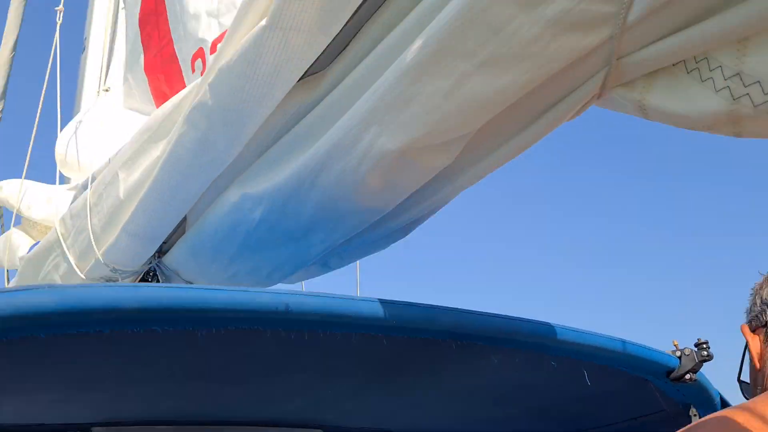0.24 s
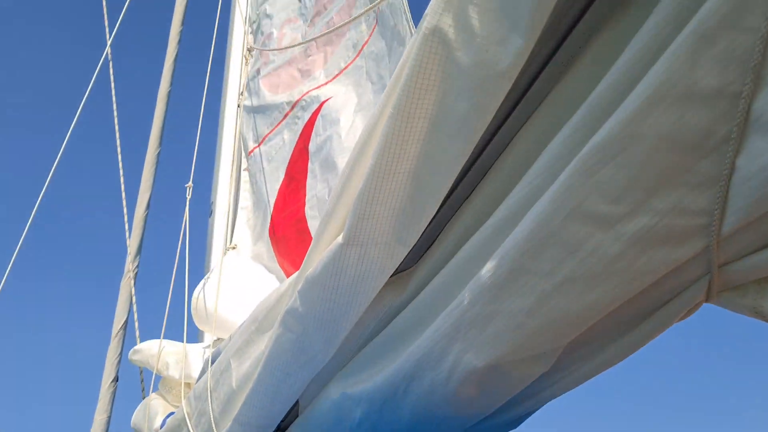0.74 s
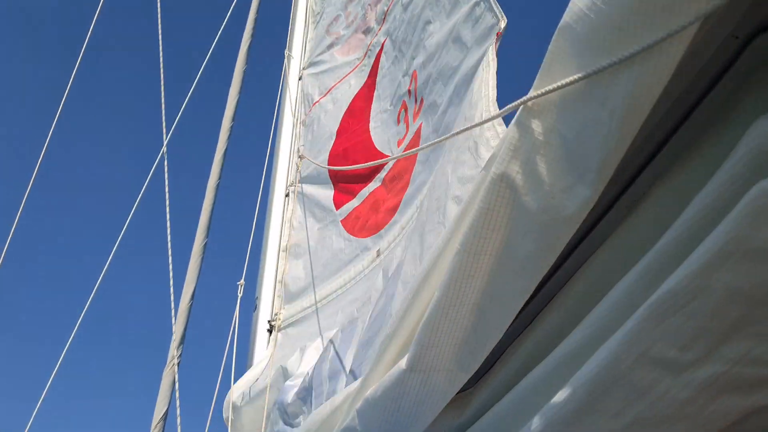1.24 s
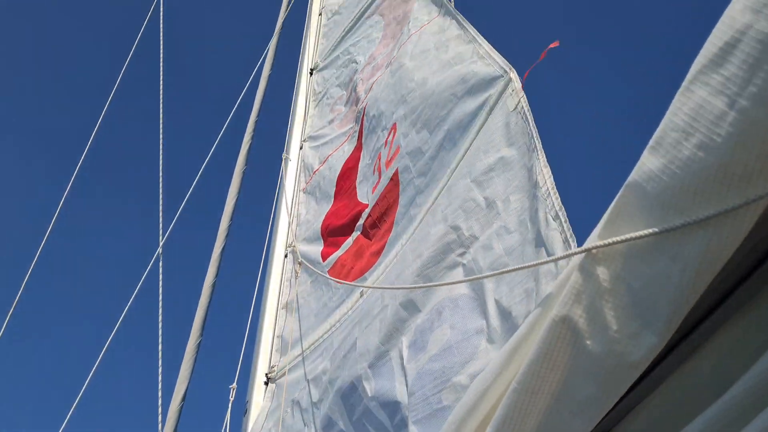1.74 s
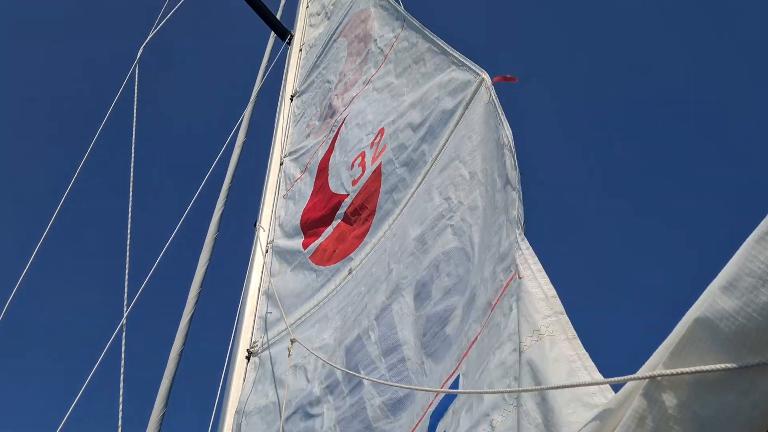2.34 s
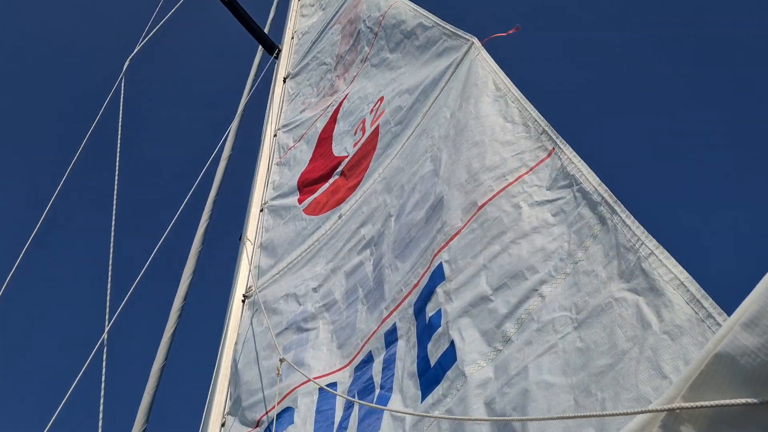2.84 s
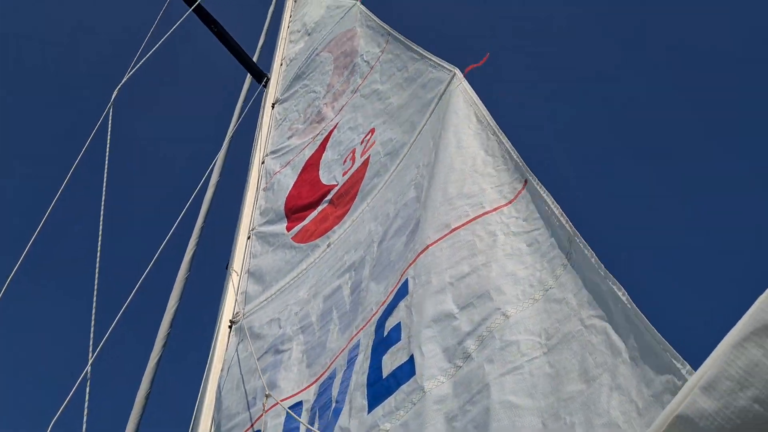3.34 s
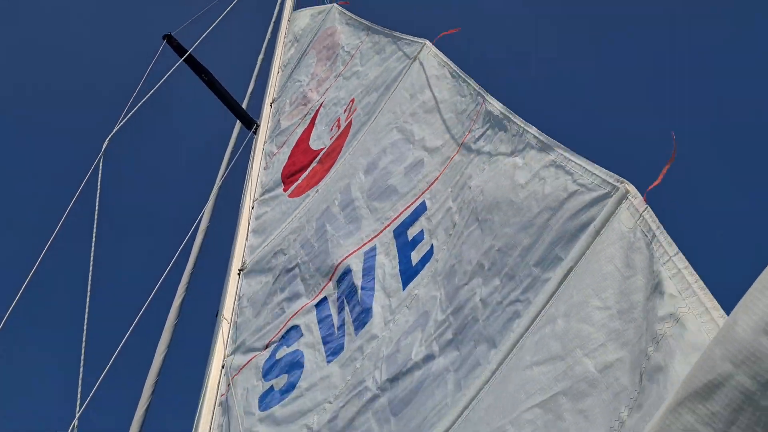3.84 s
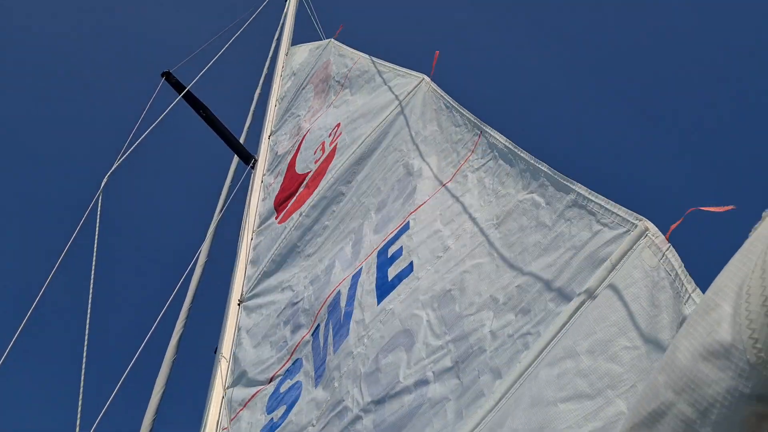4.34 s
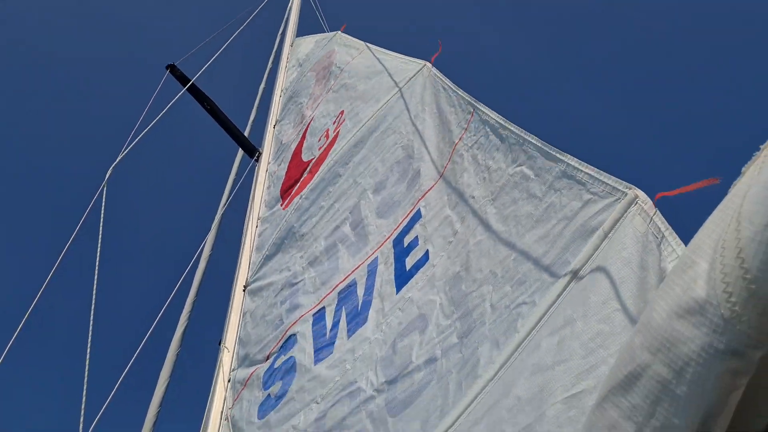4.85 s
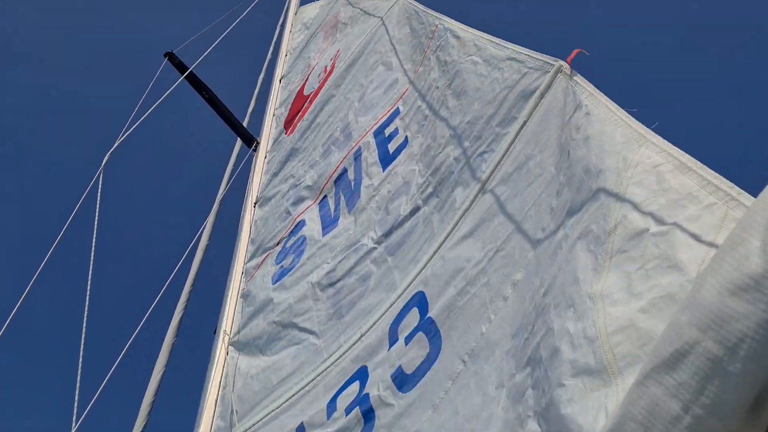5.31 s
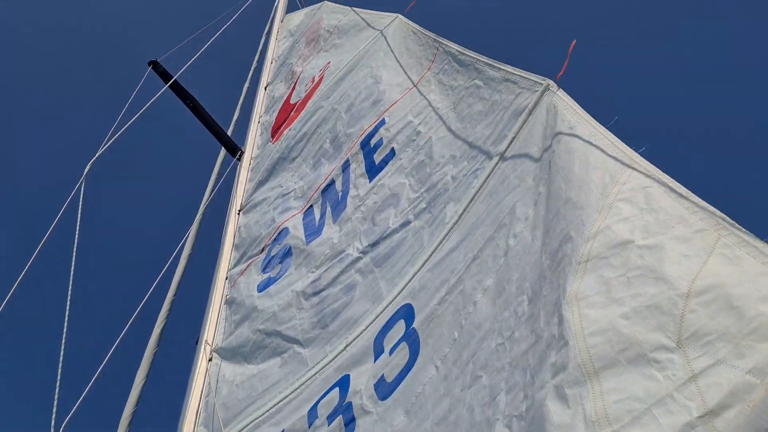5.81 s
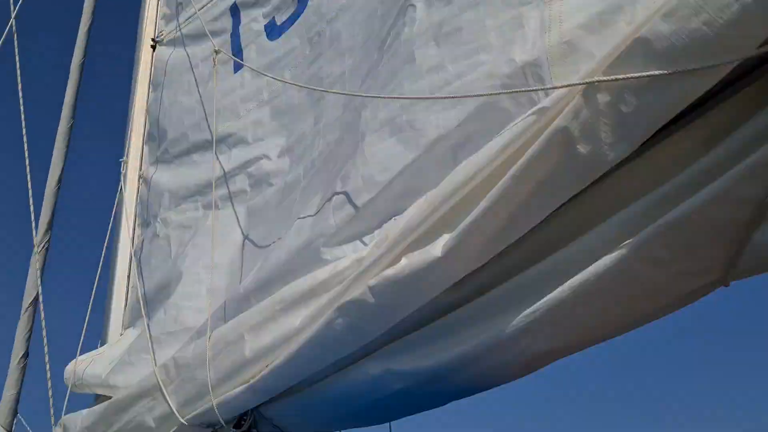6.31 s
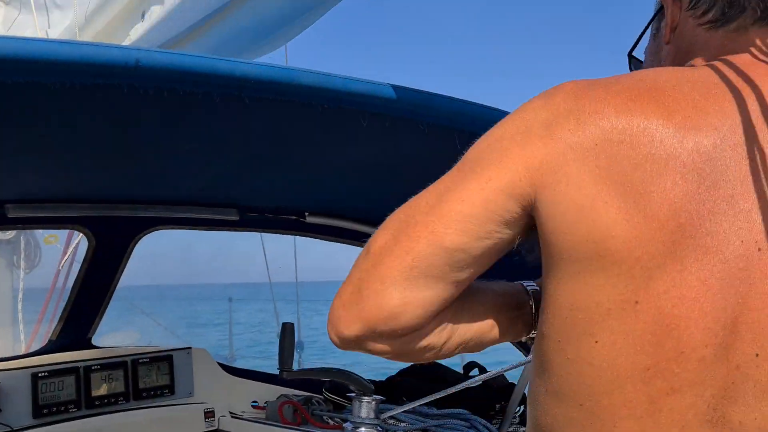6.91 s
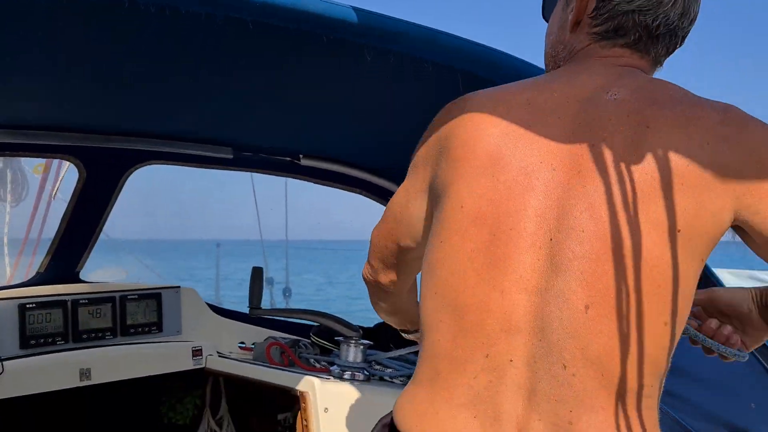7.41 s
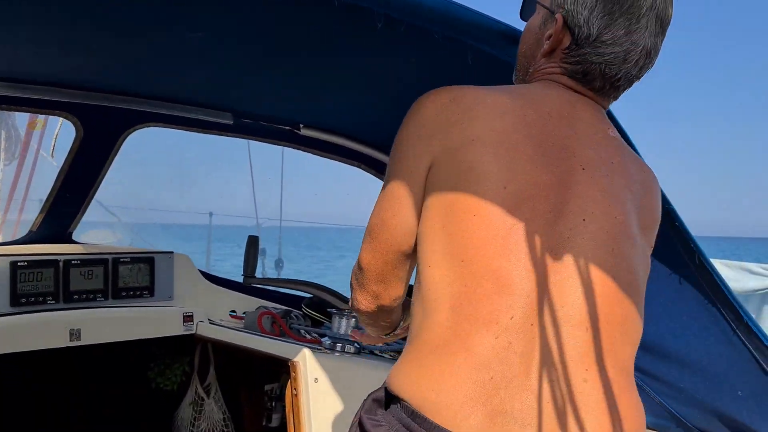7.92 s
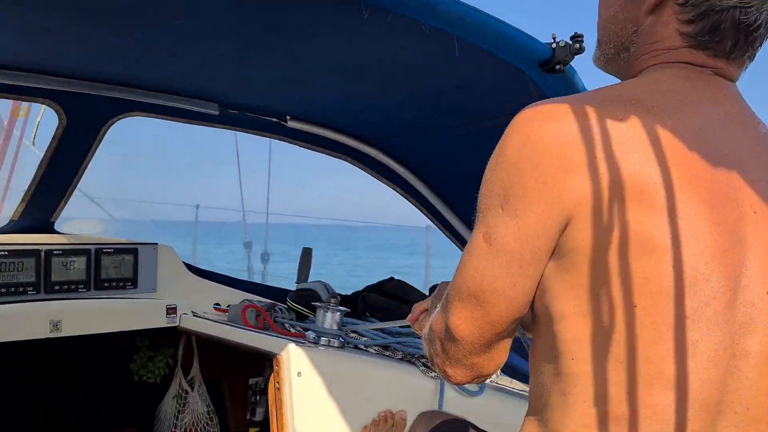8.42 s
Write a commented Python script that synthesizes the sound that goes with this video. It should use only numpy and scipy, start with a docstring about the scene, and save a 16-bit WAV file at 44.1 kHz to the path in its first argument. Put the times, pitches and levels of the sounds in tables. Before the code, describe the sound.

Bursts of rapid steel pawl clicks speed up and slow down as a small winch is cranked on deck, with quiet creaks, water and wind rumble.

```python
"""Hoisting a sail with a hand winch

A sail is hoisted in the cockpit of a small boat at anchor. On each free swing of the handle the pawls
tick, speed up to a rattle and slow again: bursts of noise for the snaps, short tones for the steel drum.
Rough noise that follows the handle's speed makes the gears whirr. Between swings the loaded rope and
fittings knock, rustle and squeak softly, and a block bumps the deck once.
Slowly varying coloured noise makes the water washing the hull and the wind buffeting the microphone."""
import sys
import numpy as np
from scipy import signal
from scipy.fft import rfft, irfft, next_fast_len
from scipy.io import wavfile
from scipy.ndimage import uniform_filter1d

SR = 44100
rng = np.random.default_rng(int(sys.argv[2]) if len(sys.argv) > 2 else 0)


def dump(signal):
    """Clip the signal to [-1, 1] and save it as 16-bit WAV at the path in sys.argv[1]."""
    limited = np.clip(np.atleast_2d(signal).T, -1, 1)
    pcm = np.round(limited * 32767).astype(np.int16)
    wavfile.write(sys.argv[1], SR, pcm)


N = 382065
TIME = np.arange(N) / SR  # seconds, for the whole scene
AGE = np.arange(4096) / SR  # seconds, for one short sound

# Free swings of the handle; the levels are taken at FULL_SPEED, before each sound's own trim:
# (first tooth [s], last tooth [s], speed at start, middle and end [teeth/s],
#  pawl snap [dB], low ring [dB], high ring [dB], gears [dB])
SWINGS = [(-0.3, 0.256, 28.05, 75.8, 36, -31, -30, -40, -38.5),
          (0.815, 1.445, 44.24, 98.94, 12.8, -31.5, -31, -40, -40),
          (2.007, 2.604, 43.65, 106.1, 29, -32.5, -32, -37, -40.5),
          (3.25, 3.879, 46.47, 92.77, 20, -33, -30, -38, -40),
          (4.698, 5.39, 33, 78.8, 25.5, -32, -30.5, -37, -38.5),
          (6.32, 6.905, 37.93, 69.9, 27.3, -30.5, -25.5, -36, -37.5),
          (8.15, 8.947, 24.3, 74.3, 1.34, -31, -25, -37, -39.5)]
# Side that the winch is heard on: (time [s], left minus right [dB])
WINCH_SIDE = [(0, -4), (1.2, -2), (5.3, -2.5), (6.5, -0.9), (8.66, 0.5)]
FULL_SPEED = 80  # teeth per second


def amp(db):
    """Turns decibels into a gain."""
    return 10 ** (np.asarray(db) / 20)


def unit(x):
    """Scales a signal to an average (rms) strength of 1."""
    return x / np.sqrt(np.mean(x ** 2) + 1e-20)


def read(points, hz):
    """Reads a table of (frequency, value) at any frequency, on a logarithmic axis."""
    f, value = np.transpose(points)
    return np.interp(np.log(hz + 1), np.log(f), value)


def curve(rows):
    """Reads a table of (time, value) at every sample."""
    return np.interp(TIME, *np.transpose(rows))


def pan(rows):
    """Left and right gains from a table of level differences, half given to each side."""
    return amp(np.array([[.5], [-.5]]) * curve(rows))


def add(mix, s, sound):
    """Adds a sound into the mix at time s, cutting off what falls outside."""
    start = round(s * SR)
    sound = sound[..., max(-start, 0):]
    part = mix[:, max(start, 0):][:, :sound.shape[-1]]
    part += sound[..., :part.shape[1]]


def noise(colour):
    """Two channels of noise, rms 1, coloured by a table of (frequency [Hz], relative level [dB])."""
    # how alike the two microphone ports sound: (frequency [Hz], likeness [-1 to 1])
    likeness = [(60, 0.61), (150, 0.28), (300, .88), (700, .88), (1300, 0.046), (2400, -0.042),
                (5000, -0.1), (15000, 0.022)]
    size = next_fast_len(N)
    hz = np.fft.rfftfreq(size, 1 / SR)
    left, other = rfft(rng.standard_normal((2, size)))
    same = np.clip(read(likeness, hz), -1, 1)
    right = same * left + np.sqrt(1 - same ** 2) * other
    spectrum = np.array([left, right]) * amp(read(colour, hz))
    return unit(irfft(spectrum, size)[:, :N])


def wander(rate_hz):
    """Random motion of rms 1 that is no faster than about rate_hz."""
    lowpass = signal.butter(2, rate_hz, fs=SR, output="sos")
    return unit(signal.sosfilt(lowpass, rng.standard_normal(N)))


def patchy(x, depth_db, seconds, width_hz):
    """Lets the colour of a sound shift at random from moment to moment."""
    hz, t, z = signal.stft(x, SR, nperseg=512)
    # random gains, blurred over neighbouring frequencies and moments
    field = rng.standard_normal(z.shape[1:])
    field = uniform_filter1d(field, max(round(width_hz / hz[1]), 1), axis=0)
    field = uniform_filter1d(field, max(round(seconds / t[1]), 1), axis=1)
    shifted = signal.istft(z * amp(depth_db * unit(field)), SR, nperseg=512)[1]
    return unit(shifted[:, :N])


def swell(rise, fall, steep=1):
    """An envelope of height 1 that builds up and dies away; steep above 1 ends it more abruptly."""
    shape = (1 - np.exp(-(AGE / rise) ** 2)) * np.exp(-(AGE / fall) ** steep)
    return shape / shape.max()


def ring(modes, rise, damping, detune, uneven_db, port_phase, phase_spread):
    """A short, quickly choked ring of a few tones, whose pitches and strengths vary each time."""
    out = np.zeros((2, len(AGE)))
    for hz, width, db in modes:
        stray, size, skew = rng.standard_normal(3)
        phase = 2 * np.pi * ((hz + detune * width * stray) * AGE + rng.random())
        ports = np.array([[0], [port_phase + phase_spread * skew]])
        # a wider resonance dies away sooner
        envelope = swell(rise, 1 / (np.pi * width * damping), steep=1.65)
        out += amp(db + uneven_db * size) * envelope * np.sin(phase + ports)
    return out


def ratchet(snap_db=3.0, pawl_db=-9.5, low_db=2.5, high_db=1.5, scrape_db=-13, grit_db=-0.35):
    """Pawls scrape up the teeth, drop off in a scatter of a few milliseconds and set the drum ringing."""
    # resonances of the drum, then of the small pawls; ring() scales the widths:
    # (frequency [Hz], width [Hz], relative level [dB])
    drum_low = [(2292, 60, -13), (2594, 60, 0)]
    drum_high = [(3830, 79, -12), (4052, 86, 2.5)]
    pawls = [(6003, 77, 0.5), (6490, 90, -0.5), (6700, 120, -8.5), (8340, 110, -11.5), (9226, 65, -10),
             (9485, 65, -12), (11550, 130, -8), (12340, 150, -2), (13185, 75, -7), (15500, 200, -6)]
    # colour of the snap: (frequency [Hz], relative level [dB])
    snap_colour = [(150, -19), (500, -14), (1200, -8), (2100, 0.5), (3100, 1.5), (3600, -6), (5100, -2),
                   (5600, -2.5), (6700, 2), (7450, -10.5), (10300, -9), (12400, 2), (13900, -3.5),
                   (15700, -2.5)]
    drum_beam = 1.0  # the drum's extra lean to one side, as a power of the winch's pan gains

    power, steel, drum = np.zeros((1, N)), np.zeros((2, N)), np.zeros((2, N))
    scatter = swell(rise=.0045, fall=.0115, steep=1.5)
    scrape = amp(scrape_db) * np.exp(-AGE[::-1] / .006)  # grows until the pawl drops
    for s, snap, low, high in teeth():
        add(power, s - .002, (amp(snap + snap_db) * scatter) ** 2)
        add(power, s - AGE[-1], (amp(snap) * scrape) ** 2)
        pawl = ring(pawls, rise=.004, damping=.33, detune=.25,
                    uneven_db=3, port_phase=.3, phase_spread=1.8)
        low_ring = ring(drum_low, rise=.007, damping=.58, detune=.35,
                        uneven_db=1.3, port_phase=1.8, phase_spread=1.1)
        high_ring = ring(drum_high, rise=.007, damping=.44, detune=.25,
                         uneven_db=1.3, port_phase=1.6, phase_spread=.9)
        add(steel, s, amp((snap + low) / 2 + pawl_db) * pawl)
        add(drum, s, amp(low + low_db) * low_ring + amp(high + high_db) * high_ring)
    grit = unit(amp(grit_db * wander(900)))  # tiny bounces within each click
    hiss = patchy(noise(snap_colour), depth_db=1.5, seconds=.012, width_hz=600)
    snaps = np.sqrt(power) * grit * hiss
    return steel + drum * pan(WINCH_SIDE) ** drum_beam + snaps


def teeth():
    """One click as each tooth passes a pawl, set by the speed: (s, snap dB, low ring dB, high ring dB)."""
    # a pawl drops over a single tooth as the handle is turned back, levels before ratchet()'s trim:
    # (time [s], snap [dB], both drum rings [dB])
    lone_clicks = [(0.476, -38, -41), (0.752, -38, -62), (0.771, -38.5, -43), (1.918, -41.5, -52),
                   (3.207, -35.5, -41), (4.65, -35.5, -46), (6.995, -38, -43.5), (8.023, -43, -45.5)]
    # dB for each doubling of speed: pawls snap harder, the low ring holds, the high ring is choked
    snap_speed_db, low_speed_db, high_speed_db = 2.6, 0, -4.9
    # dB from the start of a swing to its end: the snap hardens, the rings ease off
    snap_drift_db, low_drift_db, high_drift_db = 0.5, -2.5, -3.5
    # the first and last teeth of a swing ring the drum less
    start_db, stop_db, edge_s = -3.0, -6, 0.044
    # differences from tooth to tooth; the timing jitter is for FULL_SPEED
    jitter_s, snap_spread_db, ring_spread_db = .0013, 1.84, 0.5

    rows = [(s, snap, ring_db, ring_db) for s, snap, ring_db in lone_clicks]
    for *motion, snap, low, high, _ in SWINGS:
        t, progress, speed = handle(*motion)
        turned = np.cumsum(speed) / SR  # teeth passed so far
        at = np.interp(np.linspace(0, turned[-1], round(turned[-1]) + 1), turned, t)
        pace = np.interp(at, t, speed) / FULL_SPEED
        past_middle = np.interp(at, t, progress) - .5
        doublings = np.log2(pace)
        gentle = start_db * np.exp((t[0] - at) / edge_s) + stop_db * np.exp((at - t[-1]) / edge_s)
        late, a, b, c = rng.standard_normal((128, 4))[:len(at)].T
        times = at + jitter_s * pace * late
        snaps = snap + snap_speed_db * doublings + snap_drift_db * past_middle + snap_spread_db * a
        lows = low + low_speed_db * doublings + low_drift_db * past_middle + gentle + ring_spread_db * b
        highs = high + high_speed_db * doublings + high_drift_db * past_middle + gentle + ring_spread_db * c
        rows += zip(times, snaps, lows, highs)
    return rows


def handle(start, end, first, peak, last):
    """One swing of the arm: times, progress from 0 to 1, and a speed that arches from first over peak to last."""
    t = np.arange(start, end, 1 / SR)
    progress = np.linspace(0, 1, len(t))
    ends = first + (last - first) * progress
    arch = abs(np.sin(np.pi * progress)) ** 1.2
    return t, progress, np.maximum(ends + (peak - ends) * arch, 1)


def gears(level_db=6.0, rough_db=1.26):
    """Gear teeth and roller bearings whirr roughly, louder the faster the handle moves."""
    # colour of the whirr: (frequency [Hz], relative level [dB])
    whirr = [(100, -16), (180, -1), (290, -7), (400, -0.5), (490, -4.5), (580, -3), (700, -5.5),
             (900, -7.5), (1100, 1), (1450, -4), (2150, 2.5), (3100, 0.5), (4500, -1), (15000, -14.5)]
    speed_db = 7.5  # louder with each doubling of speed
    push_db = 1.5  # louder at the start of a swing than at its end
    coast_s = .015  # the gears take a moment to spin up and run down

    level = np.zeros(N)
    for *motion, _, _, _, db in SWINGS:
        t, progress, speed = handle(*motion)
        gain = amp(db + speed_db * np.log2(speed / FULL_SPEED) + push_db * (.5 - progress))
        level += np.interp(TIME, t, gain, left=0, right=0)
    keep = np.exp(-1 / (coast_s * SR))
    level = signal.lfilter([1 - keep], [1, -keep], level + 1e-12)
    rough = amp(level_db + rough_db * wander(120))
    return level * rough * patchy(noise(whirr), depth_db=3.0, seconds=.04, width_hz=200)


def knocks(body_db=-8, wood_db=-10, rasp_db=-12, grain_db=1.5):
    """Rope settles on the drum and in its leads: a hollow thud, a dry knock and a little rasp."""
    # soft knocks and creaks of rope and deck fittings, before the trims above:
    # (time [s], level [dB], hollow body relative to it [dB], rasp relative to it [dB])
    knock_times = [(0.508, -40.5, 2, -19), (1.532, -47, 1, -18), (1.755, -45.5, -3, 1.5),
                   (1.814, -45.5, -22, -4), (2.704, -49.5, 4.5, -27), (2.915, -46, 4.5, -25),
                   (2.963, -45, -10, -2), (4.046, -44, -12, -9), (4.172, -47, -20, -25),
                   (4.227, -52, -24, -18), (4.387, -40.5, -15, -3), (4.414, -46.5, -22, -2),
                   (5.502, -41.5, -24, 2), (5.968, -44, 0, -10), (7.197, -45.5, 10, 4.5),
                   (7.295, -39, -11, -2.5), (7.464, -57, -6, 3)]
    level = np.zeros((3, N))
    shape = swell(rise=0.0025, fall=0.014)
    for s, db, body, rasp in knock_times:
        parts_db = [[db + body + body_db], [db + wood_db], [db + rasp + rasp_db]]
        add(level, s, amp(parts_db) * shape)
    thud = noise([(100, -17.0), (200, -2), (340, -12), (520, -9.0), (1500, -48)])
    knock = noise([(400, -17.5), (750, -9.5), (1150, 7.5), (1550, 0.5), (2400, 3.5), (3500, -6), (6000, -27)])
    fibres = noise([(2500, 12.5), (4200, 0), (6500, 4), (9000, -12), (15000, -62)])
    grain = amp(grain_db * wander(350))
    return level[0] * thud + (level[1] * knock + level[2] * fibres) * grain


def rope(squeak_width_hz=25, grain_db=3):
    """The halyard (hoisting rope) slides with a soft rustle, and now and then squeaks in a lead."""
    # the rope slides: (start [s], length [s], peak level before the grain [dB])
    rubs = [(0.426, 0.13, -54), (0.69, 0.14, -57), (4.004, 0.11, -69), (5.867, 0.16, -66),
            (5.99, .08, -64.5), (6.205, 0.21, -60), (8.067, 0.17, -54.5)]
    # faint squeaks, each varied a little by ring(): (time [s], frequency [Hz], level [dB])
    squeaks = [(0.645, 1268, -66), (1.69, 780, -65), (4.388, 1204, -51), (7.462, 5500, -66.5)]
    level, out = np.zeros((1, N)), np.zeros((2, N))
    for s, length, db in rubs:
        add(level, s, amp(db) * np.hanning(round(length * SR)))
    for s, hz, db in squeaks:
        squeak = ring([(hz, squeak_width_hz, db)], rise=0.0086, damping=0.98, detune=0.34,
                      uneven_db=1, port_phase=0, phase_spread=.6)
        add(out, s, squeak)
    rustle = noise([(300, 6), (1200, 0.5), (3200, 6.0), (7000, -5.5), (9000, -15.5), (15000, -17)])
    return out + level * rustle * amp(grain_db * wander(300))


def block(clack_db=-4, tone_db=2):
    """A block (rope pulley) bumps the deck once: a burst of noise over a few fast-fading tones."""
    # the bump, before the trims above: (time [s], level [dB])
    bump = (0.561, -37.5)
    # what it rings with: (frequency [Hz], relative level [dB], time to fade by 60 dB [s])
    tones = [(497, -3, 0.05), (720, -3, 0.05), (1000, -3, 0.045), (1103, -9, 0.04), (2300, -22, 0.06)]
    out = np.zeros((2, N))
    tone = sum(amp(db - 60 * AGE / t60) * np.sin(2 * np.pi * hz * AGE) for hz, db, t60 in tones)
    clack = noise([(150, -16), (400, -4), (1100, -5), (2000, -7), (6000, -21), (15000, -38)])[:, :len(AGE)]
    clack = clack * swell(rise=0.0013, fall=0.0085)
    add(out, bump[0], amp(bump[1]) * (amp(tone_db) * tone + amp(clack_db) * clack))
    return out


def cockpit(x, wet_db=-9):
    """Short diffuse reflections off the deck and the sprayhood, as noise that fades at each frequency."""
    # decay of the reflections: (frequency [Hz], time to fade by 60 dB [s])
    decay = [(200, .24), (1000, .17), (2600, .09), (4100, .085), (7000, .105), (14000, .1)]
    size = 16384
    taps = rng.standard_normal((2, size)) * (np.arange(size) > .005 * SR)  # they start after 5 ms
    hz, t, z = signal.stft(taps, SR, nperseg=256)
    fade = amp(-60 * t / read(decay, hz)[:, None])
    tail = signal.istft(z * fade, SR, nperseg=256)[1]
    tail = tail / np.linalg.norm(tail[0])
    return x + amp(wet_db) * signal.fftconvolve(x, tail, axes=1)[:, :N]


def water(lapping_db=2.0, splash_db=1.35):
    """Small waves wash along the hull, as noise that swells and gurgles with a shifting colour."""
    # colour of the water: (frequency [Hz], relative level [dB])
    water_colour = [(60, -23), (150, -15.5), (400, -16), (800, -21.5), (1400, -21), (2500, -24.5),
                    (4200, -35), (7000, -41), (9000, -53.5), (15000, -59.5)]
    # strength of the wash, before lapping and splashes vary it: (time [s], level [dB])
    wash = [(0, -63), (1.6, -64), (2.8, -62), (3.1, -71), (4.1, -62.5), (4.55, -70), (5.5, -61), (5.8, -70),
            (6.2, -67), (7.1, -58.5), (7.55, -73), (7.95, -72), (8.66, -68.5)]
    gurgle = patchy(noise(water_colour), depth_db=2.4, seconds=.05, width_hz=220)
    return amp(curve(wash) + lapping_db * wander(7.3) + splash_db * wander(150)) * gurgle


def wind(level_db=0, lumpy_db=4.5, eddy_db=-12, eddy_spread_db=6):
    """Lumpy low buffeting on the microphone ports, with short puffs from small eddies."""
    # colour of the buffeting: (frequency [Hz], relative level [dB])
    wind_colour = [(12, -33.5), (20, -15.5), (59, 3.5), (77, 6), (166, -12.5), (206, -18), (292, -26.5),
                   (338, -40), (500, -35), (650, -60.5), (1100, -120)]
    # strength of the wind on the microphone: (time [s], level [dB])
    gusts = [(0.0, -54), (0.05, -48), (0.31, -60), (0.41, -42), (0.77, -56.5), (0.79, -47.5), (1.42, -38),
             (1.47, -47.5), (2.1, -51.5), (2.14, -64.5), (2.29, -31.5), (2.34, -37), (2.82, -61.5),
             (3.26, -41.5), (3.4, -56), (3.62, -39.5), (3.83, -36.5), (3.88, -55), (3.96, -42.5),
             (4.51, -46.5), (4.77, -40), (4.8, -56.5), (4.87, -30), (4.94, -40), (5.35, -44), (5.42, -70),
             (5.72, -36.5), (6.05, -51), (6.12, -43.5), (6.56, -51), (6.8, -45), (6.99, -59), (8.15, -66),
             (8.66, -42.5)]
    # side that the wind strikes: (time [s], left minus right [dB])
    wind_side = [(0, 1), (6.6, -1.5), (7.0, 7.5), (8.0, 10.5), (8.3, 2)]
    lumps = unit(amp(lumpy_db * np.array([wander(31), wander(15)])))  # a separate motion on each side
    puff_level = unit(amp(eddy_spread_db * np.minimum(wander(6.1), 2)))
    puffs = puff_level * noise([(50, -19.5), (110, 5.5), (190, -3.0), (300, -13), (600, -39.0), (2000, -78.0)])
    strength = amp(curve(gusts) + level_db) * pan(wind_side)
    return strength * (lumps * noise(wind_colour) + amp(eddy_db) * puffs)


def scene():
    """The winch and deck sounds with their reflections, over wind and water."""
    deck = ratchet() * pan(WINCH_SIDE) + gears() + knocks() + rope() + block()
    return cockpit(deck) + wind() + water()


def record(dry):
    """A steep low-pass filter that takes away the very highest treble."""
    edge_hz = 15850
    lowpass = signal.firwin(511, edge_hz, window=("kaiser", 9), fs=SR)
    return signal.oaconvolve(dry, lowpass[None], "same")


dry = scene()
out = record(dry)
dump(out)
```